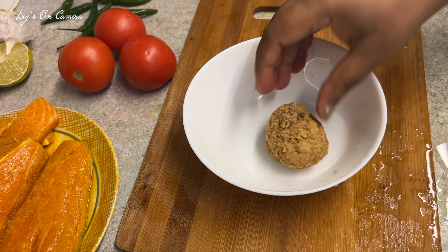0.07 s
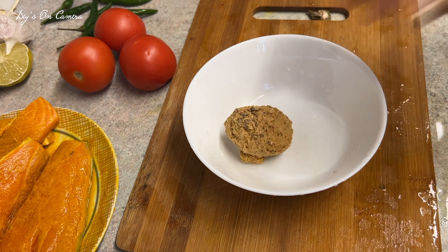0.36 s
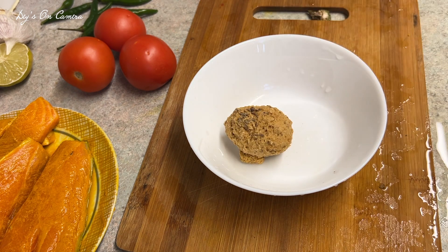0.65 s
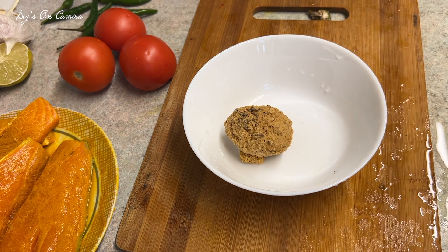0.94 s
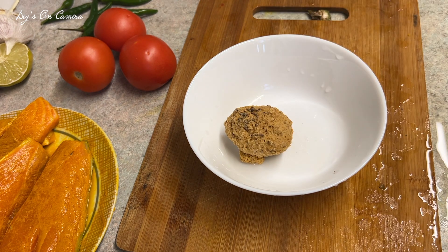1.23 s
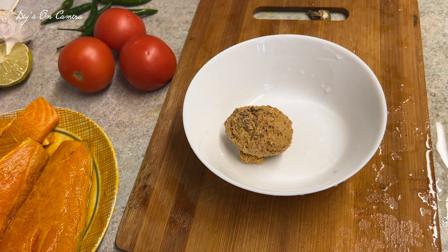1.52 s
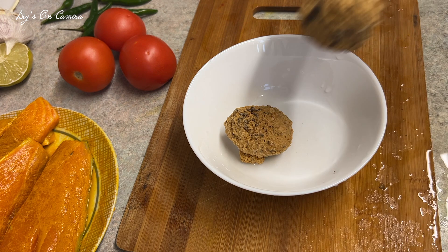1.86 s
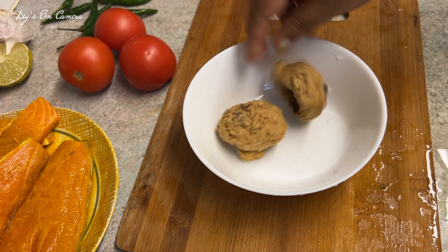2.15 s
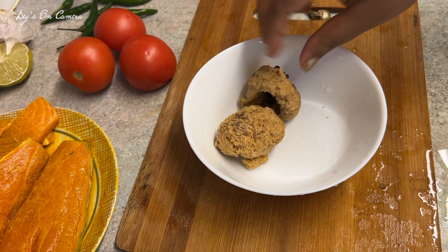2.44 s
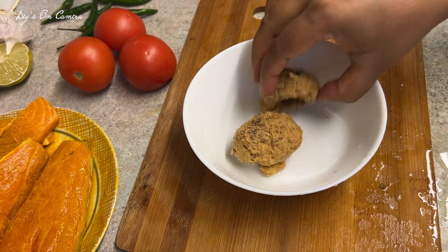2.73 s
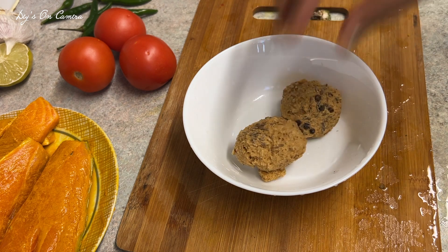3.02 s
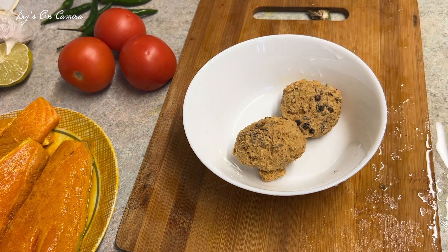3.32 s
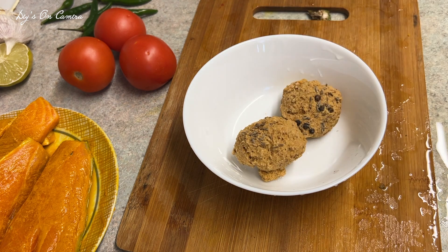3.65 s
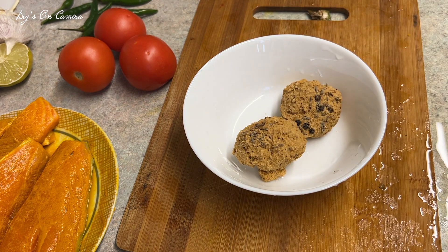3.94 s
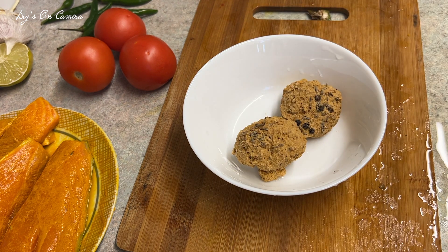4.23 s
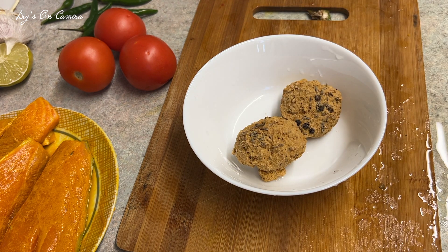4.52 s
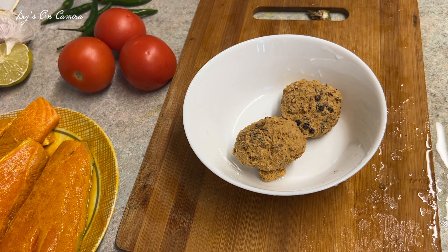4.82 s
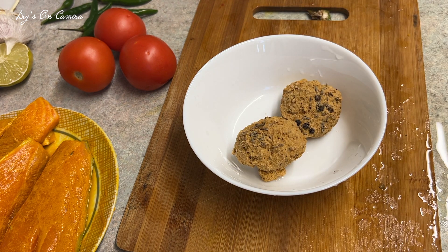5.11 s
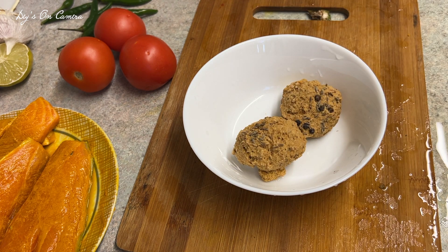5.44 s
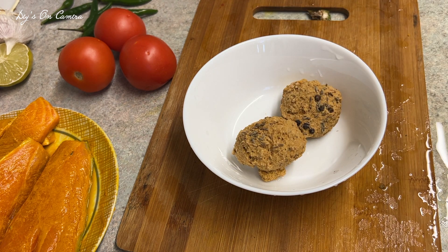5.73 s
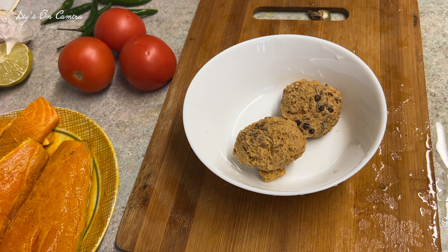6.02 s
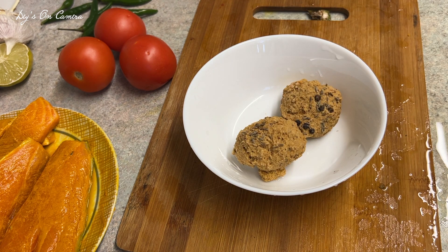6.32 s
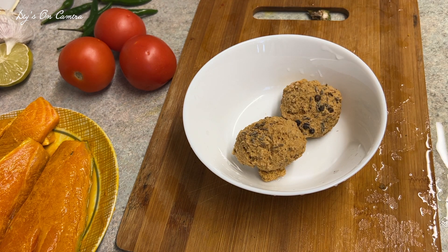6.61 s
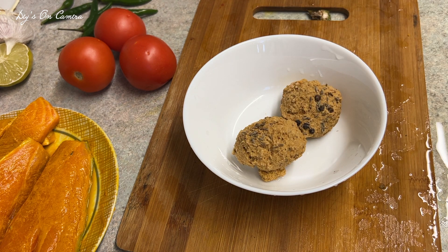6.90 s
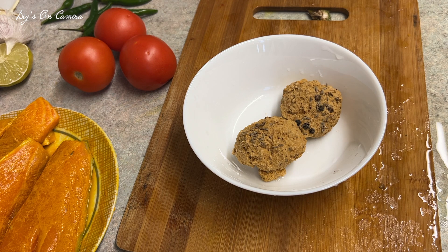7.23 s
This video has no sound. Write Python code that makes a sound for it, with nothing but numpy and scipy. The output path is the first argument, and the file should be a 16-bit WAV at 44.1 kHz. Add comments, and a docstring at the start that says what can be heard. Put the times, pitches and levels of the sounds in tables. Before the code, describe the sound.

Hard dried dumplings knock and rattle into a ceramic bowl, then a plastic bag crinkles off to the right in a humming kitchen.

```python
"""A small kitchen, humming and echoing, the microphone close to a ceramic bowl on a wooden board.
Hard dried dumplings are set and dropped in: each knock clacks in the lump, thuds in the board and
faintly rings the bowl. Further off to the right a hand digs for more in a plastic bag, where creases
snap, film crinkles and lumps tumble. Late on, dull bumps come through the counter, and a low
throbbing drone enters at the very end."""
import sys
import numpy as np
from scipy import signal
from scipy.fft import rfft, irfft, next_fast_len
from scipy.io import wavfile

SR = 44100
rng = np.random.default_rng(int(sys.argv[2]) if len(sys.argv) > 2 else 0)


def materialize(psi):
    """Save the field psi as 16-bit PCM at rate SR to the path in sys.argv[1].

    A 1-D psi becomes a single channel; in a 2-D psi each row is a channel.
    """
    bounded = np.clip(np.atleast_2d(psi).T, -1, 1)
    quanta = np.round(bounded * 32767).astype(np.int16)
    wavfile.write(sys.argv[1], SR, quanta)


N = 324840
TIME = np.arange(N) / SR
FFT_SIZE = next_fast_len(N, True)
BIN_HZ = np.fft.rfftfreq(FFT_SIZE, 1 / SR)

# Room tone. Each row: frequency in Hz, level in dB.
AIR_SPECTRUM = [(20, -28), (48, -4), (74, -12), (100, -4), (140, -3), (180, -12), (225, -9), (330, -22),
                (480, -20), (1000, -32), (2000, -27), (3200, -38), (7000, -47), (11000, -58), (16000, -63)]
HUM_LINES = [(48.4, -61.5), (102.3, -70), (215.3, -76.5)]
# The kitchen's echo. Each row: frequency in Hz, seconds to fall 60 dB.
ROOM_T60 = [(100, .5), (260, 0.27), (700, 0.31), (1800, 0.2326), (5000, 0.3), (13000, 0.1349)]
# Strength of that echo. Each row: frequency in Hz, gain in dB.
ROOM_GAIN = [(60, -13), (150, -3), (400, 2), (1000, 3), (2200, -3), (5000, 0), (14000, 3)]
# How alike left and right are. Each row: frequency in Hz, correlation from -1 to 1.
ROOM_LIKENESS = [(50, 0.99), (120, 0.91), (300, 0.44), (1000, 0.29), (16000, 0.3)]
SIDE_LIKENESS = [(50, 1), (130, 0.15), (290, -0.13), (640, -0.53), (1400, -0.26), (3000, 0.39),
                 (7000, 0.44), (16000, -0.23)]  # the bag's echo, arriving from the side
# Dumplings on the bowl. Each row: start in seconds, relative level in dB, treble in dB, clack in Hz.
KNOCKS = [(0.0024, -25.5, -21, 1110), (0.0317, -19, -12.5, 1440), (0.0536, -19.5, -22, 1170),
          (0.0609, -21.5, -22, 1610), (0.0736, -26, -26, 1310), (0.1564, -44.5, -8.5, 2640),
          (0.2198, -41, -20, 1610), (2.0493, -17, -15.5, 1970), (2.0972, -0.5, -16.5, 2044),
          (2.1466, -29, -27, 1800), (2.2144, -25, -17, 1750), (2.2799, -19, -24, 2560),
          (2.2915, -27.5, -33, 2200), (2.3091, -29, -13, 2630), (2.3149, -17.5, -24, 1560),
          (2.387, -27, -8.5, 2030), (2.4527, -28.5, -19, 2650), (2.4619, -30, -27.5, 2000),
          (2.4793, -29.5, -43, 2050), (2.587, -33.5, -16.5, 1760), (2.6251, -35.5, -16.5, 1840),
          (2.6872, -27.5, -20.5, 1886), (2.8401, -23.5, -8, 1860), (2.8571, -15, -23, 1514),
          (2.9187, -7, -23.5, 2190), (2.9312, -26, -18.5, 2000), (2.9671, -13, -17, 1590),
          (2.9842, -21.5, -35, 2030), (2.9911, -23, -31, 1620), (3.0073, -21, -19.5, 1250),
          (3.0212, -25, -38, 2170)]
# Resonances. Each row: frequency in Hz, relative level in dB, seconds to fall 60 dB.
BOWL_MODES = [(795, -36.5, 0.5), (888, -36, 0.31), (1830, -39.5, 1.27), (2016, -40.5, .14),
              (3144, -53, 0.64), (3830, -29, .07), (3930, -35.5, 0.18), (4050, -45.5, .16),
              (4300, -56.5, 0.32), (5615, -57.5, .14), (6360, -52.5, .12), (8856, -60.5, .1),
              (11700, -57.5, .07)]
BOARD_MODES = [(91, -22, 0.27), (116.7, -19.5, .42), (154, -18.5, 0.15), (175, -17.5, 0.13),
               (217.3, -18, 0.31), (347, -33, 0.14), (420, -32, 0.34), (461, -24.5, 0.36),
               (629, -30.5, 0.13)]
BAG_HOLLOW_MODES = [(196.9, -13.5, 0.25), (350, -20, 0.13), (564, -16, 0.16), (807, -15, 0.24),
                    (900, -17.5, 0.048)]
# The hand in the bag. Each row: start and length in seconds, then relative levels in dB of
# film flexing, film crinkling and lumps shuffling.
HAND_STROKES = [(0.85, 0.12, -50, -55.5, -50), (1.035, 0.24, -56, -58.5, -39),
                (1.26, 0.11, -43.5, -44.5, -28), (1.41, 0.038, -51, -42, -56),
                (1.51, 0.065, -43.5, -64, -34.5), (1.87, .07, -68, -75.5, -70.5),
                (3.27, .20, -69.5, -70, -56.5), (3.72, 0.07, -58, -54.5, -54),
                (3.99, 0.065, -54.5, -56.5, -55.5), (4.20, 0.17, -56.5, -71, -55),
                (4.415, 0.021, -40.5, -57.5, -56), (4.54, 0.2, -51.5, -53, -56),
                (5.07, 0.058, -40, -61, -41), (5.25, .19, -48.5, -53.5, -51.5),
                (5.49, 0.16, -46, -52.5, -39), (5.765, 0.012, -33, -35.5, -29.5),
                (5.815, 0.055, -29, -44, -28.5), (6.05, 0.14, -60, -62.5, -53),
                (6.19, 0.039, -29, -66, -32), (6.33, .21, -55.5, -73, -51), (6.60, 0.27, -53, -65, -52.5),
                (6.83, 0.18, -44, -57.5, -45), (7.04, 0.053, -35, -55, -37)]
# Creases snapping. Each row: start in seconds, relative level in dB, fizz in dB, patch pitch in Hz.
CREASE_SNAPS = [(0.858, -36, -14, 1750), (0.8695, -35.5, -8.5, 1840), (0.9397, -28, -0.5, 3180),
                (0.9785, -31, 5, 4470), (1.067, -32, -3.5, 940), (1.106, -30, -7, 3270),
                (1.1808, -33, -10, 2190), (1.3043, -26.5, -4.5, 1006), (1.3582, -23, -19, 3200),
                (1.503, -23.5, 4, 3200), (1.5586, -29.5, 9, 4000), (1.572, -21, -4.5, 3100),
                (3.4523, -43.5, -9.5, 3840), (3.721, -45, 3, 3950), (4.0962, -27, -17, 1400),
                (4.205, -29.5, -7.5, 2250), (4.2324, -37, 0, 3830), (4.391, -22.5, -13, 1880),
                (4.4035, -33.5, -5, 2500), (4.4193, -21.5, -25, 1770), (4.5635, -38, -7, 2070),
                (4.634, -25, -3.5, 3080), (4.8486, -33, -11, 1830), (4.877, -19, -13, 4560),
                (4.8818, -19.5, -1.5, 1920), (4.9386, -24.5, -5, 1580), (5.0585, -42.5, 3.5, 2510),
                (5.0751, -31, 5.5, 2180), (5.1023, -29, 2, 2970), (5.1141, -21, -7, 1124),
                (5.1332, -24.5, -2.5, 1900), (5.253, -33.5, -17, 1110), (5.3812, -30, -19, 940),
                (5.5724, -35, -2, 3200), (5.6241, -31, -24, 910), (5.7744, -19.5, -6, 990),
                (5.782, -21.5, -7, 965), (5.8633, -33, -13, 1720), (6.003, -36, -10, 2460),
                (6.123, -43, 0.5, 2240), (6.1943, -25.5, -16, 980), (6.2044, -27.5, -37, 945),
                (6.225, -40, -27, 930), (6.319, -39.5, 6.5, 920), (6.423, -39.5, -1.5, 2230),
                (6.4909, -37.5, -7, 1010), (6.584, -45.5, 1, 2680), (6.6884, -41, -2, 1850),
                (6.7423, -29, 0.5, 2220), (7.0025, -43.5, 7, 2380), (7.0305, -31, -0.5, 2200),
                (7.0659, -26.5, 2, 2220), (7.0821, -17.5, -0.5, 2320), (7.1053, -18.5, 6.5, 1074),
                (7.1119, -18.5, -13, 1860)]
# Lumps knocking inside the bag. Each row: start in seconds, relative level in dB, pitch in Hz.
TUMBLES = [(0.929, -25, 398), (0.942, -31, 194), (1.042, -32.5, 370), (1.062, -31, 195), (1.174, -29, 410),
           (1.188, -35, 200), (1.271, -30.5, 420), (1.302, -29.5, 335), (1.345, -31, 340),
           (1.369, -27, 351), (1.517, -26, 385), (1.535, -33, 572), (1.565, -37, 210), (1.632, -39.5, 221),
           (5.383, -31, 353), (5.633, -28.5, 410), (5.866, -25, 186), (6.201, -29, 208), (6.228, -42, 330),
           (7.112, -31.5, 194), (7.118, -28, 422)]
# Bumps through the counter. Each row: start in seconds, length in seconds, relative level in dB.
BUMPS = [(5.70, 0.089, -38.5), (6.885, 0.059, -33), (7.03, .07, -49)]
# Tone colours. Each row: frequency in Hz, relative level in dB.
CONTACT_SPECTRUM = [(40, -2), (150, 27.5), (260, 25.5), (520, 28), (850, 26), (1400, 18), (2200, 16),
                    (3000, 10), (4000, 6), (6000, 11.5), (9000, 10.5), (15000, -4.5)]  # dumpling on ceramic
SHUFFLE_SPECTRUM = [(60, -26.5), (130, -10.5), (195, 3.5), (270, -6), (350, 3), (560, -5), (820, -9.5),
                    (1300, -12), (3000, -23.5), (8000, -60)]  # lumps shifting in the bag
FLEX_SPECTRUM = [(200, -27.5), (600, -11), (800, 9), (1000, 5.5), (1250, -3.5), (1500, -7.5), (2100, -5),
                 (3500, -14), (6000, -20), (14000, -47)]  # film bending
CRINKLE_SPECTRUM = [(500, -39.5), (2500, -5.5), (4500, -3), (8000, -2), (10500, -6), (12000, -14),
                    (16000, -16)]  # film crinkling
CREASE_SPECTRUM = [(40, 2.5), (120, 11), (200, 29.2), (550, 21.6), (950, 27), (1300, 19), (1900, 18.25),
                   (3000, 19.1), (4500, 17.7), (8000, 21.8), (11000, 13.6), (16000, 2.7)]  # one crease snapping
BUMP_SPECTRUM = [(15, -27), (35, -1), (65, -4.5), (115, -4.5), (180, -12.5), (500, -56), (3000, -84)]  # the counter
# An uneven top octave, with dips near 10.3 and 14 kHz. Each row: frequency in Hz, gain in dB.
TREBLE_COLOUR = [(6500, 0), (8000, -0.5), (9400, -0.5), (10300, -12.5), (11500, 7), (12800, -3.5),
                 (14000, -5), (15200, 4)]


def amp(db):
    """Decibels to gain."""
    return np.exp(np.asarray(db) * (np.log(10) / 20))


def unit(x):
    """Scales to rms 1."""
    return x / np.sqrt(np.mean(x ** 2) + 1e-20)


def read(points, hz):
    """Reads a table on a log-frequency axis."""
    f, value = np.transpose(points)
    return np.interp(np.log(hz + 1), np.log(f + 1), value)


def add(mix, start_s, sound):
    """Mixes a sound in at its start time."""
    part = mix[max(round(start_s * SR), 0):][:len(sound)]
    part += sound[:len(part)]


def tint(x, spectrum):
    """Gives a steady sound a spectrum, at rms 1."""
    return unit(irfft(rfft(x, FFT_SIZE) * amp(read(spectrum, BIN_HZ)), FFT_SIZE)[..., :N])


def click(spectrum, bass_db, treble_db, size=2048):
    """A minimum-phase click of a given spectrum, with its own bass and treble."""
    hz = abs(np.fft.fftfreq(size, 1 / SR))
    shelves = [(550, bass_db), (1500, 0.013), (3500, 0), (8000, treble_db)]
    log_gain = np.log(amp(read(spectrum, hz) + read(shelves, hz)))
    return np.fft.ifft(np.exp(np.conj(signal.hilbert(log_gain)))).real[:size // 2]


def ping(hz, t60, size=4096):
    """One resonance: a decaying sine."""
    t = TIME[:size]
    return np.exp(-np.log(1000) * t / t60) * np.sin(2 * np.pi * hz * t)


def modes_of(table):
    """One decaying sine a mode, of alternating sign."""
    return np.array([(-1) ** k * amp(db) * ping(hz, t60, SR) for k, (hz, db, t60) in enumerate(table)])


def room_tone(air_db=-57, waver_cycles=0.18):
    """Soft room noise all round the microphone, and a wavering appliance hum in the centre."""
    left, other = rfft(rng.standard_normal((2, FFT_SIZE)))
    same = read(ROOM_LIKENESS, BIN_HZ)
    right = same * left + np.sqrt(1 - same ** 2) * other
    air = irfft(np.array([left, right]) * amp(read(AIR_SPECTRUM, BIN_HZ)), FFT_SIZE)[:, :N]
    drift = waver_cycles * np.interp(TIME, np.linspace(0, TIME[-1], 40), rng.standard_normal(40))
    hum = sum(amp(db) * unit(np.sin(2 * np.pi * (hz * TIME + drift))) for hz, db in HUM_LINES)
    return amp(air_db) * unit(air) + hum


def dumplings_in_bowl(clack_db=-8, grit_db=-17, grit_s=0.005, spot_db=2, bowl_db=3, foot_db=-8,
                      hardness=0.99, echo_db=0.2, ring_echo_db=-9, pan_db=1):
    """Close up, each contact is a gritty push with a short clack; it rings the bowl and the board."""
    contact, ringing = np.zeros((2, N))
    ceramic, wood = modes_of(BOWL_MODES), modes_of(BOARD_MODES).sum(0)
    grits = np.diff(rng.standard_normal((len(KNOCKS), 500)), axis=1)
    spots = 2 * rng.random((len(KNOCKS), len(BOWL_MODES))) - 1  # each spot favours other modes
    for (start, db, treble_db, hz), grit, spot in zip(KNOCKS, grits, spots):
        thud_db = -8.5 - 0.2042 * db  # softer contacts are duller, with relatively more bass and board thud
        push = amp(grit_db) * grit * np.exp(-TIME[:len(grit)] / grit_s)  # the crust crumbles a little
        push[0] += 1
        add(contact, start, amp(db) * np.convolve(push, click(CONTACT_SPECTRUM, thud_db, treble_db)))
        add(contact, start + 1 / hz, amp(db + clack_db) * ping(hz, t60=0.014))
        # The first lump rocks on the foot, where the bowl hardly moves.
        ring_db = bowl_db + foot_db * (start < 1)
        mode_gains = amp(hardness * db + ring_db + spot_db * spot)  # hard blows ring most
        add(ringing, start, mode_gains @ ceramic)
        add(ringing, start, amp(db + thud_db) * wood)
    direct = (contact + ringing) * amp([[pan_db], [-pan_db]])
    return direct + amp(echo_db) * kitchen_echo(contact + amp(ring_echo_db) * ringing, ROOM_LIKENESS)


def kitchen_echo(x, likeness, frame=256, patterns=2, first_s=0.00038):
    """Dense reflections die band by band; their pattern slowly shifts, as when a hand moves about."""
    out, length = np.zeros((2, N)), SR // 2
    onset = np.clip(TIME[:length] / first_s - 1, 0, 1)
    for k in range(patterns):
        hz, t, bands = signal.stft(rng.standard_normal((2, length)), SR, nperseg=frame)
        same = read(likeness, hz)[:, None]
        bands[1] = same * bands[0] + np.sqrt(1 - same ** 2) * bands[1]
        decay_rate = np.log(1000) / read(ROOM_T60, hz)[:, None]
        decay = np.exp(-decay_rate * t) * np.sqrt(2 * decay_rate / SR)
        bands *= amp(read(ROOM_GAIN, hz))[:, None] * decay
        tail = signal.istft(bands, SR, nperseg=frame)[1][:, :length] * onset
        crossfade = np.sqrt(2 / patterns) * np.cos(np.pi * (TIME + k / patterns))
        out += signal.oaconvolve((x * crossfade)[None], tail, axes=1)[:, :N]
    return out


def pushes(rows, column, grip_s, swell_db, let_go_s):
    """Gain over time of pushes that take hold, swell and die away; column picks their level."""
    gain, t = np.zeros(N), TIME[:SR]
    for row in rows:
        start, length = row[:2]
        grip = np.minimum(t / grip_s, 1)
        swell = amp(row[column] + swell_db * (np.minimum(t / length, 1) - 1.5))
        let_go = np.exp(-np.maximum(t - length, 0) / let_go_s)
        add(gain, start, grip * swell * let_go)
    return gain


def grains(per_s, spread_db):
    """Random tiny clicks of uneven size."""
    clicks = (rng.random(N) < per_s / SR) * rng.choice([-1, 1], N)
    return clicks * amp(spread_db * np.minimum(rng.exponential(1, N), 4))


def buckling_patches(per_s=70, low_hz=850, high_hz=7500, cycles=45, db_per_octave=-5.5, count=16):
    """Small patches of film buckle at random, each ringing briefly at its own pitch."""
    out = np.zeros(N)
    for hz in np.geomspace(low_hz, high_hz, count):
        gain = amp(db_per_octave * np.log2(hz / low_hz)) * np.sqrt(hz)
        out += gain * signal.oaconvolve(grains(per_s / count, spread_db=4), ping(hz, cycles / hz))[:N]
    return unit(out)


def hand_rustle(shuffle_db=-7, flex_db=-4, patches_db=-8):
    """Each stroke shuffles the lumps and bends and crinkles the film, swelling as the film tightens."""
    flex, crinkle, shuffle = (pushes(HAND_STROKES, column, grip_s=0.027, swell_db=1.5, let_go_s=0.022)
                              for column in (2, 3, 4))
    out = amp(shuffle_db) * shuffle * tint(grains(per_s=400, spread_db=2.5), SHUFFLE_SPECTRUM)
    out += amp(flex_db) * flex * tint(grains(per_s=500, spread_db=3.5), FLEX_SPECTRUM)
    out += crinkle * tint(grains(per_s=350, spread_db=6.5), CRINKLE_SPECTRUM)
    return out + amp(patches_db) * flex * buckling_patches()


def crease_snaps(chatter_db=-10, chatter_s=0.0023, patch_db=-5, patch_cycles=30):
    """A crease buckles with a sharp click and a run of smaller ones; the patch of film rings briefly."""
    out, t = np.zeros(N), TIME[:1500]
    for start, db, fizz_db, hz in CREASE_SNAPS:
        body_db = -5 - 13.5 * np.log2(hz / 1000)  # smaller, higher patches have less body
        run = amp(chatter_db) * unit(rng.standard_normal(len(t)) ** 3) * np.exp(-t / chatter_s)
        run[0] = 1
        run /= np.linalg.norm(run)
        add(out, start, amp(db) * np.convolve(run, click(CREASE_SPECTRUM, body_db, fizz_db)))
        add(out, start, amp(db + patch_db) * ping(hz, patch_cycles / hz))  # low patches ring longer
    return out


def tumbling_lumps(knock_t60=0.055, cushion_s=0.0012):
    """Lumps fall against each other; the cushioned knocks sound in the hollow of the bag."""
    out, hollow = np.zeros(N), modes_of(BAG_HOLLOW_MODES).sum(0)
    for start, db, hz in TUMBLES:
        knock = ping(hz, knock_t60)
        knock *= 1 - np.exp(-TIME[:len(knock)] / cushion_s)
        add(out, start, amp(db) * knock)
        add(out, start, amp(db) * hollow)
    return out


def plastic_bag(snap_db=2, tumble_db=1, echo_db=0.5, pan_db=0.96, lag_samples=18):
    """The bag lies further off to the right, so it reaches the left channel later and softer."""
    bag = amp(snap_db) * crease_snaps() + amp(tumble_db) * tumbling_lumps() + hand_rustle()
    left = np.pad(bag, (lag_samples, 0))[:N]
    direct = np.array([left, bag]) * amp([[-pan_db], [pan_db]])
    return direct + amp(echo_db) * kitchen_echo(bag, SIDE_LIKENESS)


def counter_bumps():
    """Dull bumps come through the counter, alike in both channels."""
    even_noise = np.sign(tint(rng.standard_normal(N), BUMP_SPECTRUM))  # squared off for even strength
    rumble = tint(even_noise, BUMP_SPECTRUM)
    return rumble * pushes(BUMPS, column=2, grip_s=0.011, swell_db=3, let_go_s=0.06)


def low_drone(start_s=7.135, rise_s=0.062, hz=56, db=-43.5, throb_hz=10.7, throb_depth=0.43):
    """A low throbbing tone comes in at the end, in the centre."""
    t = TIME - start_s
    fade_in = np.clip(t / rise_s, 0, 1)
    throb = 1 + throb_depth * np.cos(2 * np.pi * throb_hz * t)
    return amp(db) * fade_in * throb * unit(np.sin(2 * np.pi * hz * TIME))


def scene():
    """The kitchen from the microphone's place: bowl near, bag to the right, room all round."""
    return dumplings_in_bowl() + plastic_bag() + counter_bumps() + low_drone() + room_tone()


def record(dry, ceiling=0.88, edge_hz=16300):
    """The top octave is made uneven; the recorder clips at its ceiling, then limits the band."""
    colour = click(TREBLE_COLOUR, bass_db=0, treble_db=0)
    heard = signal.oaconvolve(dry, colour[None], axes=1)[:, :N]
    clipped = np.clip(heard, -ceiling, ceiling)
    lowpass = signal.firwin(511, edge_hz, window=("kaiser", 9), fs=SR)
    return signal.oaconvolve(clipped, lowpass[None], "same")


dry = scene()
out = record(dry)
materialize(out)
```